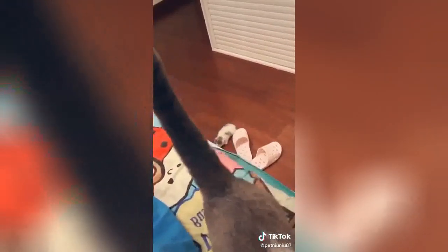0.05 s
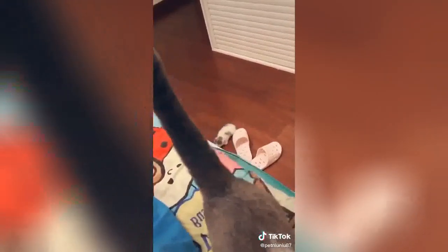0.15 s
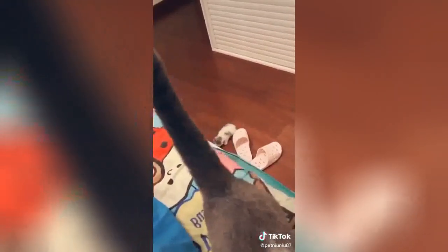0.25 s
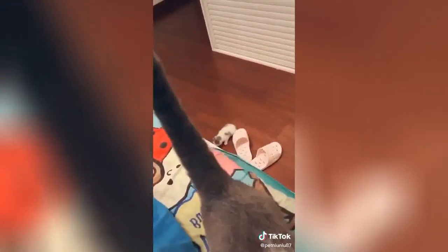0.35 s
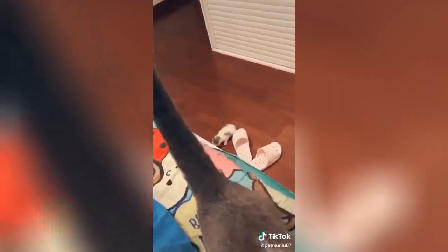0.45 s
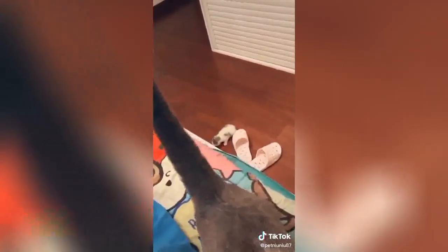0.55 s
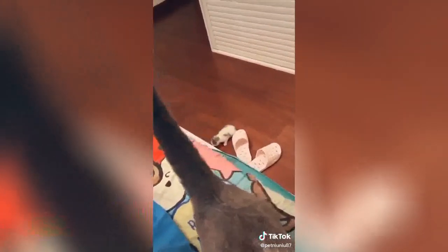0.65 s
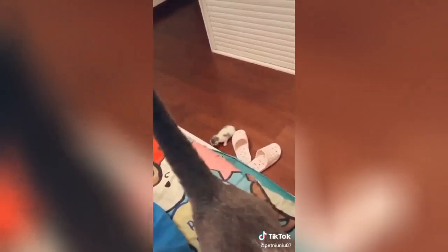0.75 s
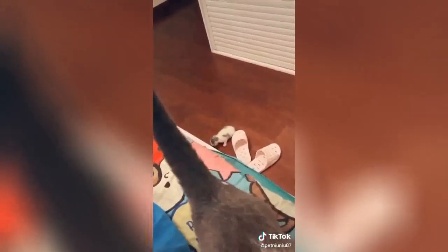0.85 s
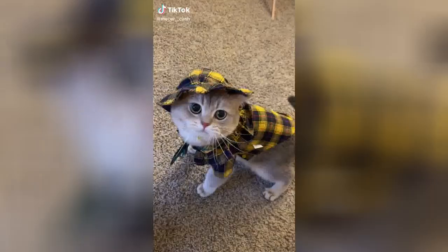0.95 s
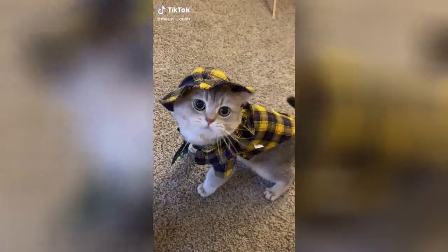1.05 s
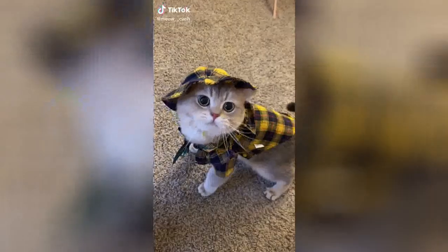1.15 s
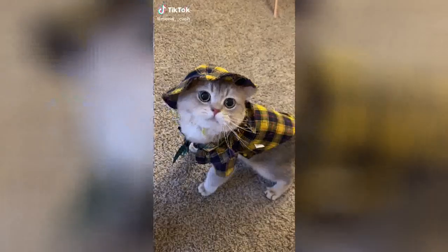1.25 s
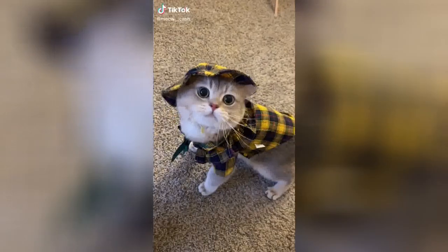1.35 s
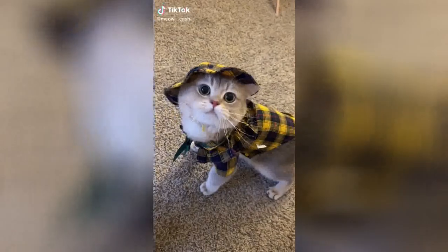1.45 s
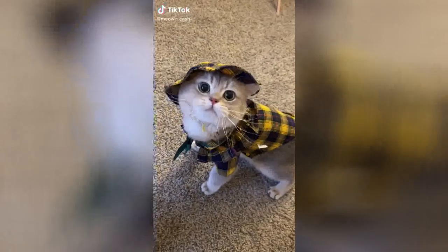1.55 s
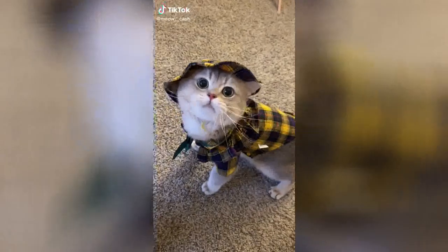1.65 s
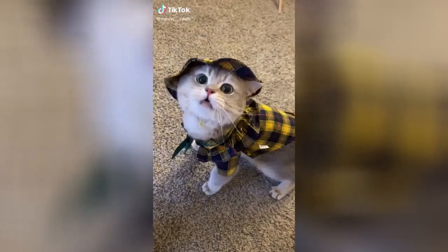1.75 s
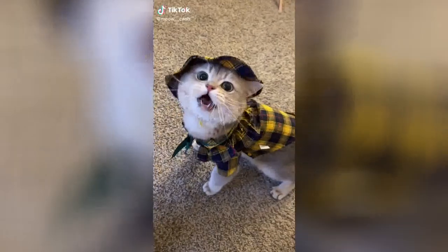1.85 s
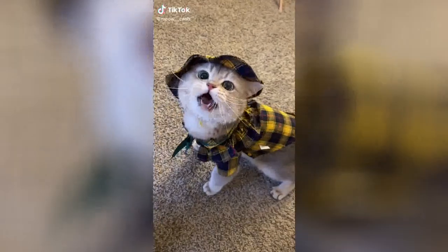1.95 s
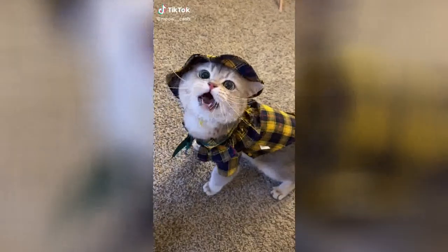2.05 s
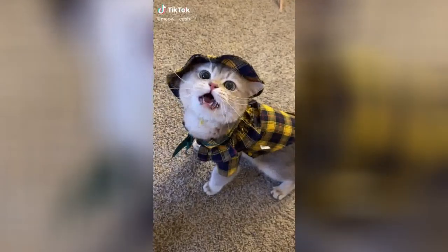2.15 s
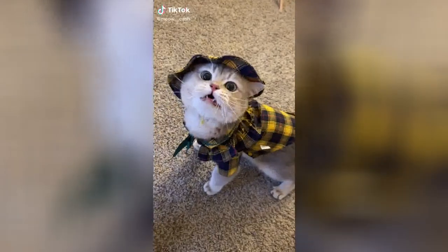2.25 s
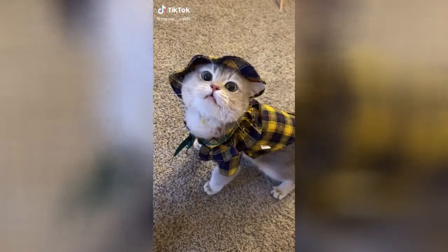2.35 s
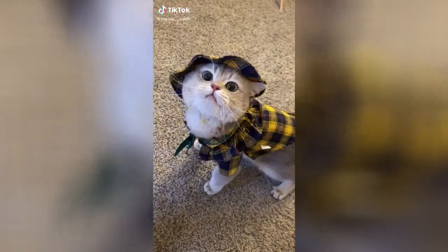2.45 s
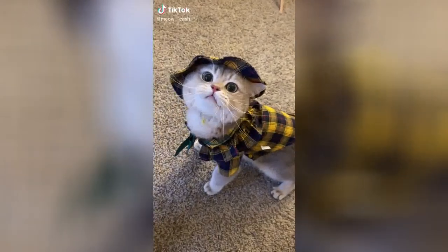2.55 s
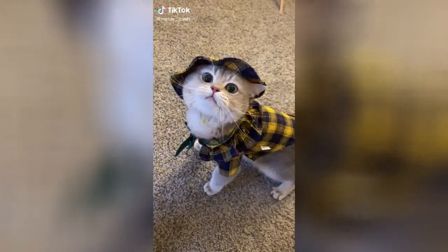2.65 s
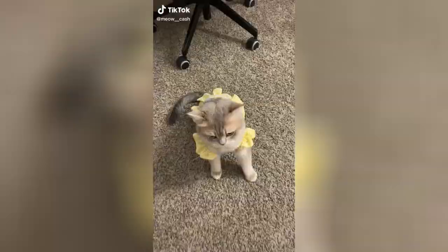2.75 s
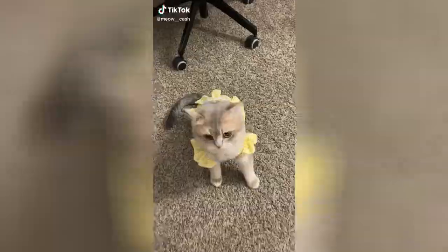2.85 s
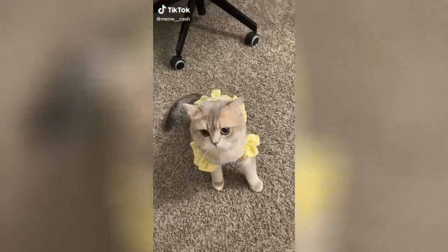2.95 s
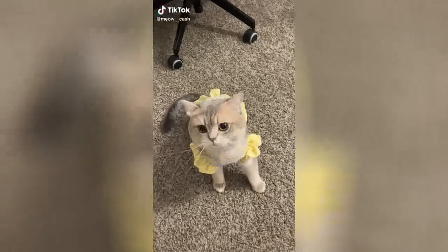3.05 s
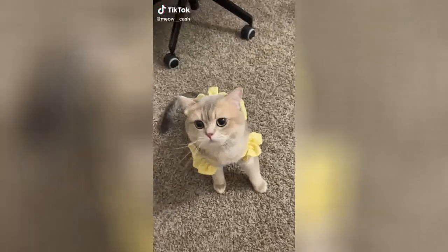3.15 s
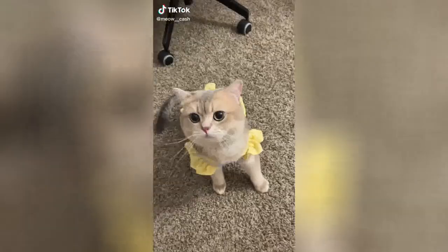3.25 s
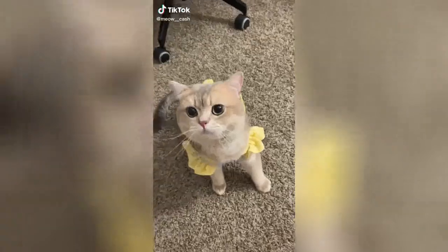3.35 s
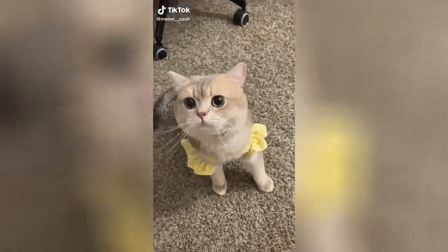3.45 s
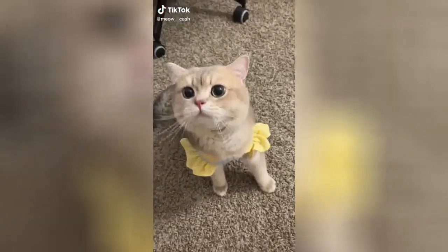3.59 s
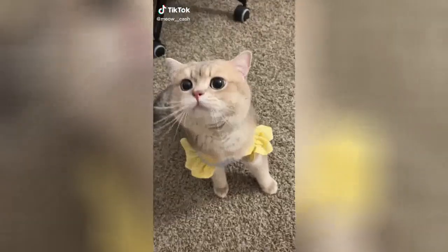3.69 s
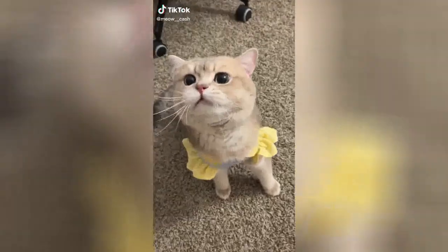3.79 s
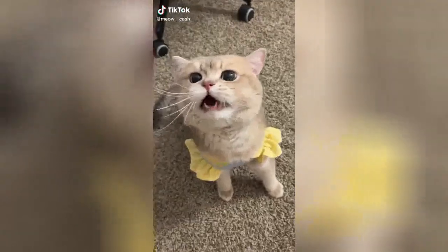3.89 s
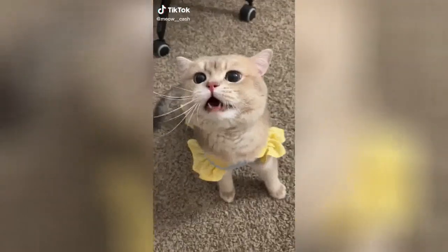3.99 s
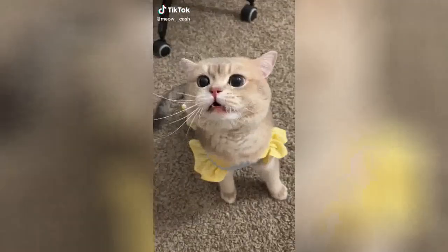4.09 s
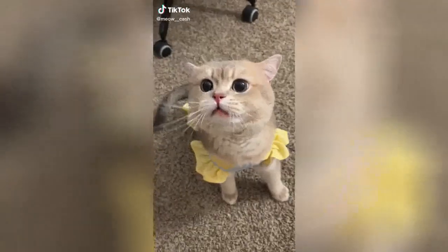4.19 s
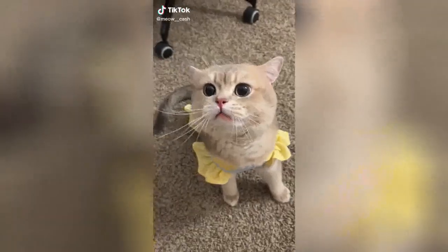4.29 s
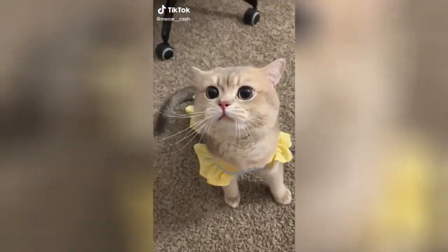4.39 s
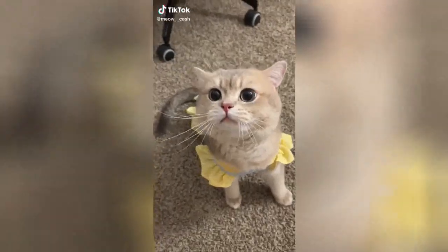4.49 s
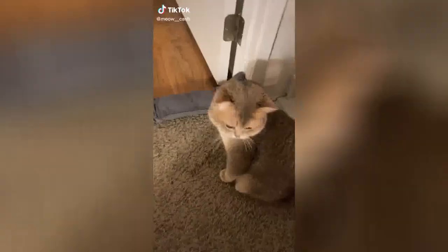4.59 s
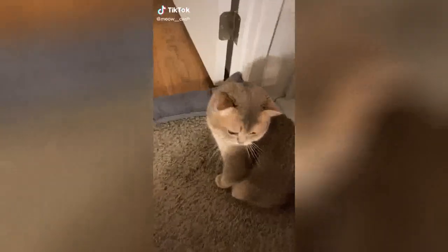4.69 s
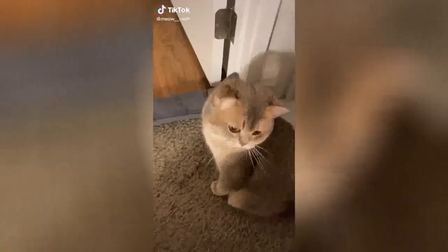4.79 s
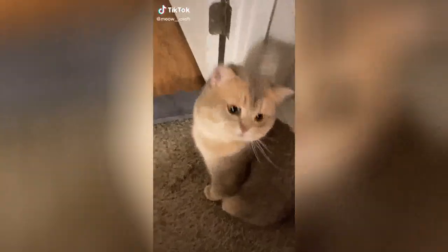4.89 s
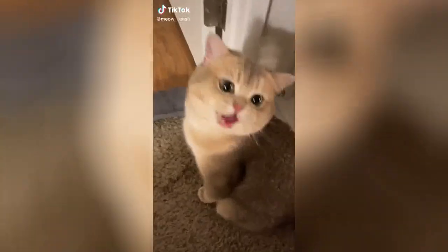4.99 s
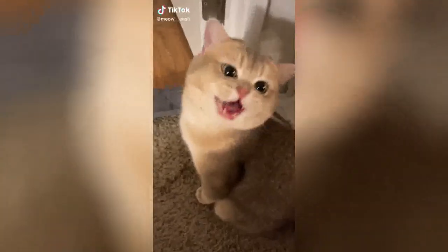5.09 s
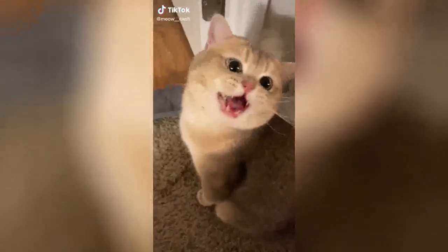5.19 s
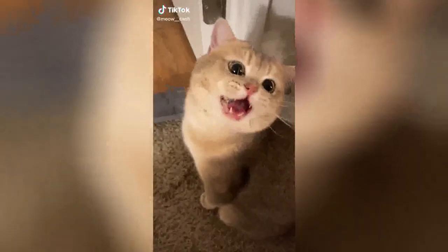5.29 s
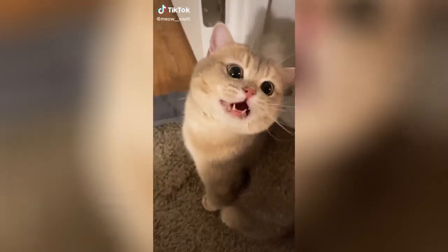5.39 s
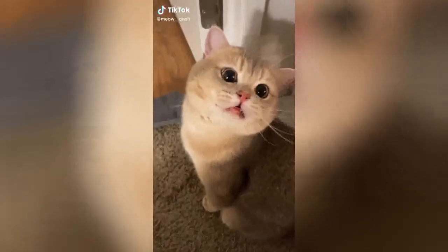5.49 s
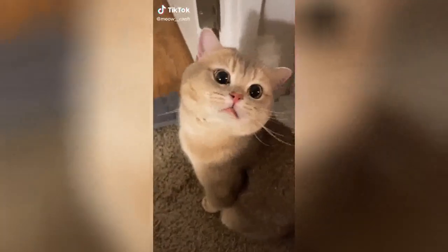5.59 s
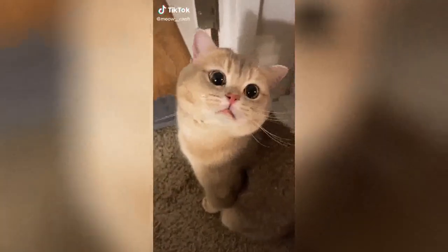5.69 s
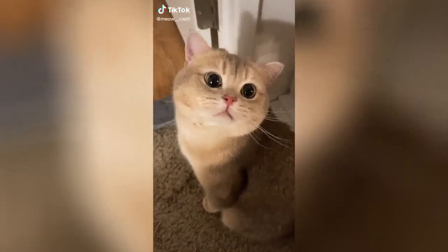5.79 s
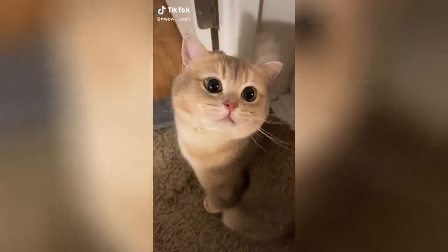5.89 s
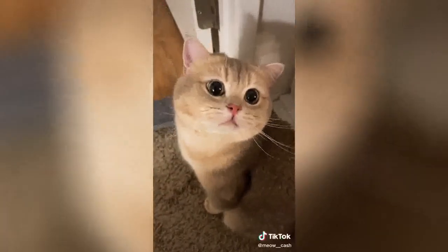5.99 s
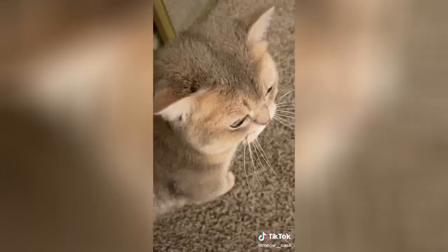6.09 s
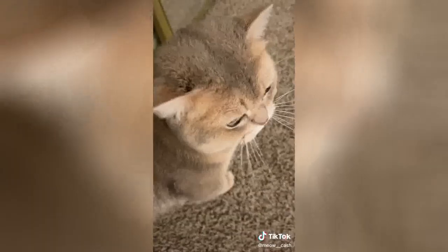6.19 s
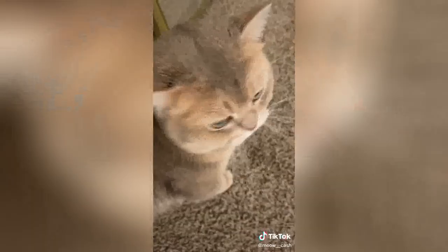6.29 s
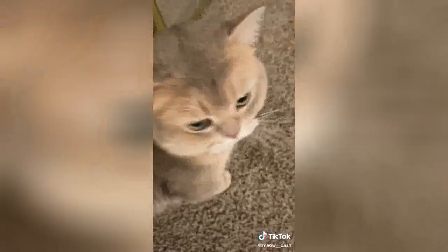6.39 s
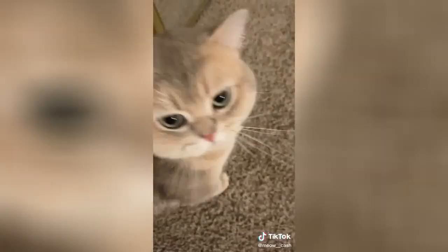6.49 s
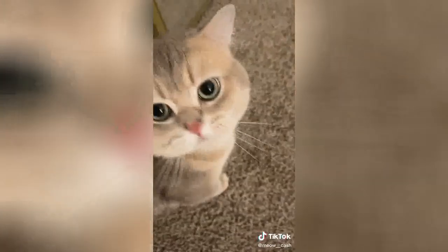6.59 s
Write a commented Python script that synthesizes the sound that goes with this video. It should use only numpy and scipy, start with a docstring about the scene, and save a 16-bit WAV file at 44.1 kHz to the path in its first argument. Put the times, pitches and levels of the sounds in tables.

```python
"""Cats meow close by in quiet rooms, each with its own hum, air and short echo; silent joins part the rooms.
First comes a faint, high, falling meow. The next two start with the mouth closed, trilling about 40 times
a second, then open and ring clean and bright; the later one also growls. A plain open meow follows, and
a last, trilled one is cut short. Each is a stack of harmonics shaped by throat and mouth (source and
filter). Along the way fur rustles, lips smack and small things tick."""
import sys
import numpy as np
from scipy import signal
from scipy.fft import rfft, irfft
from scipy.io import wavfile
from scipy.ndimage import uniform_filter1d

SR = 44100
rng = np.random.default_rng(int(sys.argv[2]) if len(sys.argv) > 2 else 0)


def wav_out(sig):
    """Save sig, one row per channel (or a flat mono array), as 16-bit PCM at SR to the path in sys.argv[1]."""
    wavfile.write(sys.argv[1], SR, np.round(np.clip(np.atleast_2d(sig).T, -1, 1) * 32767).astype(np.int16))


N = 292824
T = np.arange(N) / SR
TOP_HZ = 13300
OPPOSED = np.array([[1], [-1]])  # plus on the left, minus on the right

# The rooms in turn. Each row: start in seconds, end in seconds, hum frequency in Hz, hum width in Hz,
# hum over rumble in dB, side over mid of the air in dB.
ROOMS = [(0.193, 0.833, 68, 12, 4, -30.5), (1.116, 2.712, 56.7, 13.5, -0.5, -3),
         (2.724, 3.392, 55, 22, -8.5, -26.5), (3.407, 4.521, 52.4, 16, 2, -17.5),
         (4.541, 6.076, 56.9, 6.7, 5, -5), (6.083, 6.646, 59, 20, -14, -12)]
# Treble spectrum of the open mouth, one list a meow. Each point: frequency in Hz, relative level in dB.
OPEN_TREBLE = [
    [(3710, -32), (6300, -10), (7000, 0), (8050, -5), (9100, -1), (10200, -6), (11400, -14), (13400, -30)],
    [(1880, -15), (3200, 7.5), (4220, -4), (4780, -7), (6650, 2), (7630, -5.5), (8500, -15.5), (8860, -38),
     (9520, -24), (10600, -19), (11000, -28), (12900, -41), (13400, -73)],
    [(2120, -27), (3600, -12), (3870, -27), (4220, 2), (4590, -15), (6780, -6), (7120, -17), (8630, -18),
     (8870, -42), (11900, -35), (13400, -61)],
    [(2120, -30), (3700, 0), (4300, -6), (4850, -20), (5660, -5), (6300, -5), (7110, -8), (8330, -19),
     (8940, -35), (9760, -25), (12700, -30), (13400, -46)],
    [(1880, -18), (3200, 10), (3900, -15), (4320, 8), (4900, -16), (5290, -12), (5690, -20), (6810, -12),
     (7630, -35), (10400, 5.5), (13400, -28)],
]
# Treble spectrum of a closed mouth. Each point: frequency in Hz, relative level in dB.
CLOSED_TREBLE = [(1880, -41), (3200, -11), (4420, 11.5), (4720, -11), (4840, -34), (4990, -22), (5450, -31),
                 (6730, 3), (8650, -27.5), (9810, 0), (10600, -24), (11600, -24), (13400, -65)]
# Lower edge of each meow's treble in Hz.
TREBLE_EDGE_HZ = [6300, 3200, 3600, 3600, 3200]


def undb(db):
    """Amplitude ratio of a level in decibels."""
    return 10 ** (np.asarray(db) / 20)


def unit(x):
    """Normalisation to an rms of 1."""
    return x / np.sqrt(np.mean(x ** 2) + 1e-30)


def on_log(spectrum, hz):
    """Level in dB, interpolated on a logarithmic frequency axis."""
    f, db = np.transpose(spectrum)
    return np.interp(np.log(np.maximum(hz, 1)), np.log(f), db)


def coloured(size, gain_at):
    """Spectral shaping: white noise weighted by gain_at(Hz), at an rms of 1."""
    m = 2 ** int(np.ceil(np.log2(size)))
    spectrum = rfft(rng.standard_normal(m)) * gain_at(np.arange(m // 2 + 1) * SR / m)
    return unit(irfft(spectrum, m)[:size])


def wander(size, rate_hz):
    """Low-pass noise: a smooth random fluctuation with an rms of 1."""
    return coloured(size, lambda f: (f > 0) / (1 + (f / rate_hz) ** 4))


def fade(t, start, end, edge_s):
    """Trapezoidal envelope."""
    return np.clip(np.minimum(t - start, end - t) / edge_s, 0, 1)


def blend(pair, share):
    """Linear interpolation from the first value of a pair to the second."""
    return pair[0] + share * (pair[1] - pair[0])


def room_tone(room, t):
    """Shaped noise: rumble and a resonant hum in the middle, air above 250 Hz with some stereo width."""
    # Noise spectrum, one list a room. Each point: frequency in Hz, relative level in dB.
    spectra = [
        [(15, -39.5), (25, -5.5), (88, -6), (115, -9.5), (135, -18), (304, -23), (688, -39), (850, -36.5),
         (1560, -35), (11200, -50.5), (13500, -69)],
        [(15, -40.5), (25, -22.5), (48, -9), (118, -4.5), (166, -19), (347, -23), (515, -31.5), (785, -42.5),
         (944, -49.5), (1020, -42.5), (1160, -79.5), (1870, -35), (2500, -53.5), (10900, -66), (13500, -70.5)],
        [(15, -30), (25, 3), (86, -11.5), (124, -9.5), (289, -17.5), (452, -30.5), (620, -37), (2500, -42),
         (6440, -61.5), (10900, -45.5), (13500, -57.5)],
        [(15, -35.5), (25, -12.5), (58, -1.5), (86, -26), (121, -12), (321, -30.5), (347, -34), (558, -42),
         (725, -71), (2020, -47.5), (3080, -57.5), (10900, -72.5), (13500, -66.5)],
        [(15, -61), (25, -30), (54, -8.5), (154, -16.5), (205, -28), (338, -16), (429, -28), (653, -36.5),
         (745, -39), (1200, -40.5), (5080, -64.5), (6610, -42), (8840, -87), (11800, -55), (13500, -92)],
        [(15, -61), (25, -31), (124, 11.5), (440, -14.5), (636, -29), (1110, -18.5), (2130, -43.5),
         (2930, -33.5), (9070, -54.5), (11200, -30), (13500, -51)],
    ]
    # Level of each room's air in dB.
    air_db = [-61.5, -53.5, -66, -57.5, -49, -59.5]
    # Bass level of each room. Each row: level at the start in dB, level at the end in dB.
    bass_levels = [(-47, -46), (-37, -41), (-48, -52), (-41, -45), (-38, -41), (-53, -50)]
    # Swells of the bass. Each row: centre in seconds, half length in seconds, rise in dB.
    swells = [(4.7, .07, 6), (5.65, .15, 4), (6.31, .06, 13)]
    start, end, hum_hz, width_hz, hum_db, side_db = ROOMS[room]
    n = len(t)
    rumble = coloured(n, lambda f: undb(on_log(spectra[room], f)) * (f < 250))
    hum = coloured(n, lambda f: 1 / (1 + (2 * (f - hum_hz) / width_hz) ** 2))
    mid, side = (coloured(n, lambda f: undb(on_log(spectra[room], f)) * (f >= 250)) for _ in range(2))
    air = undb(air_db[room] + wander(n, 4)) * (mid + undb(side_db) * side * OPPOSED)
    bass_db = np.interp(t, (start, end), bass_levels[room]) + 2.2 * wander(n, 5)
    bass_db += sum(db * np.exp(-((t - centre) / half_s) ** 2) for centre, half_s, db in swells)
    return undb(bass_db) * unit(rumble + undb(hum_db) * hum) + air


def rustle():
    """Friction noise of fur and cloth: each grainy stroke rises quickly, holds and dies away."""
    # Each row: start in seconds, time until the decay in seconds, level below 5 kHz in dB, above it in dB.
    strokes = [(2.73, .05, -62, -71), (2.81, .05, -57, -70), (3.05, .15, -69, -78), (3.31, .07, -69, -74),
               (4.43, .07, -67, -77), (4.51, .012, -56, -69), (4.55, .12, -58, -61), (4.66, .1, -53, -55),
               (4.83, .035, -46, -70), (6.09, .06, -65, -70), (6.22, .08, -58, -80), (6.3, .03, -56, -76)]
    attack_s, t60_s = .03, .2
    grain = undb(2 * wander(N, 58))
    low = coloured(N, lambda f: (f > 300) * (f < 5000) / (1 + (f / 1500) ** 2) ** .81)
    high = coloured(N, lambda f: (f >= 5000) * (f < 12200) * (1 - .98 * (abs(f - 9000) < 350)))
    out = np.zeros(N)
    for start, held_s, low_db, high_db in strokes:
        attack = np.clip((T - start) / attack_s, 0, 1)
        decay = 1000. ** (-np.maximum(T - start - held_s, 0) / t60_s)
        out += attack * decay * (undb(low_db) * low + undb(high_db) * high)
    return out * grain


def ticks():
    """Ticks and lip smacks: an impulse and a short noise burst excite a broad resonance."""
    # Each row: start in seconds, peak level in dB, centre frequency in Hz, nominal bandwidth in Hz.
    snaps = [(1.6462, -33, 6500, 6000), (2.8066, -30, 2220, 4000), (3.7884, -23, 11500, 7000),
             (3.8074, -14, 4450, 5000), (3.8155, -17, 5000, 12000), (4.2018, -35, 2200, 2800),
             (4.5186, -41, 1960, 4000), (4.8718, -27, 1950, 4000), (6.2622, -38, 1100, 1400),
             (6.3135, -33, 1200, 1800), (6.5894, -33, 9500, 5000)]
    t60_s = .025
    out, t = np.zeros(N + SR), np.arange(4096) / SR
    for start, db, hz, width_hz in snaps:
        burst = rng.standard_normal(len(t)) * 1000. ** (-t / t60_s)
        burst[0] = 2.5
        b, a = signal.iirpeak(hz, hz / width_hz, SR)
        ring = signal.lfilter(b, a, signal.lfilter(b, a, burst))
        i = int(start * SR)
        out[i:i + len(t)] += undb(db) * ring / np.abs(ring).max()
    return out[:N]


def reverberate(sound, t60_s, echo_db):
    """Convolution with a room's impulse response: the direct sound, then exponentially decaying noise."""
    t = np.arange(SR // 2) / SR
    response = rng.standard_normal(len(t)) * 1000. ** (-t / t60_s) * np.clip(t / .0042, 0, 1)
    response *= undb(echo_db) / np.sqrt(np.sum(response ** 2))
    response[0] = 1
    return signal.fftconvolve(sound, response[None], axes=1)


def panning(call, freqs, shut):
    """Level difference between channels: each harmonic's left gain, the reciprocal of its right gain."""
    # Each row: a meow's shut and open curves (None is the middle) of frequency in Hz,
    # left over right in dB.
    places = [(None, None), ([(60, 0.0), (110, 0.0), (200, 0.0), (360, -2.5), (660, 7.0), (1190, 14.0),
              (2170, 0.5), (3940, -1.5), (7160, 0.5), (13000, 0.5)], [(350, -1.6), (650, 9.8), (1200, 4.2),
              (2100, -.6), (4000, -4.2), (7000, .4), (12500, -2.4)]), (None, None), (None, [(350, -.2),
              (650, -6.4), (1200, -3.4), (2100, -.6), (4000, -.2), (12500, -.6)]), (None, None)]
    shut_db, open_db = (on_log(curve, freqs) if curve else 0 * freqs for curve in places[call])
    return undb(blend((open_db, shut_db), shut) / 2)


def breath(call, closed, mouth_gain, treble_gain, nose_gain):
    """Turbulence noise in the mouth band, in the treble and, while the mouth is closed, in the nose."""
    n = len(closed)
    nose = coloured(n, lambda f: (f > 250) / (1 + ((f - 900) / 350) ** 2))
    mouth = coloured(n, lambda f: (f / 2700) ** 4 / (1 + (f / 2700) ** 8))
    trebles = [coloured(n, lambda f: undb(on_log(curve, f)) * (f > TREBLE_EDGE_HZ[call]))
               for curve in (CLOSED_TREBLE, OPEN_TREBLE[call])]
    return mouth_gain * mouth + treble_gain * blend(trebles, 1 - closed) + closed * nose_gain * nose


def throat_db(call, freqs, brightness):
    """Transfer function of the throat for the low harmonics, blended between two curves by brightness."""
    # Each row: a meow's shut and open curves of frequency in Hz, level over effort in dB.
    throats = [ ([(600, -6), (1100, 0), (2200, -10), (3400, -16), (4100, -18), (4600, -4)], [(600, -8),
               (1100, 0), (1500, 15), (2300, 16), (3400, -4), (4600, 0)]), ([(340, 0), (670, -4), (735, 2),
               (1000, 0), (1090, -8), (1400, -17)], [(400, -10), (750, 2), (790, -5), (830, -8),
               (1230, -17), (1640, -21)]), ([(360, 0), (720, -1), (1080, -8), (1450, -14), (2400, -21)],
               [(470, -7), (610, -13), (950, 0), (1220, -9), (1400, -18), (1800, 3), (2000, 0),
               (2450, -22)]), ([(390, 0), (460, -3), (780, -3), (900, 1), (1200, -14), (1350, -21),
               (1700, -21)], [(400, -10), (470, -8), (800, 1), (930, -1), (1200, -7), (1400, -3),
               (1650, -11), (1780, -18), (1900, -5)]), ([(360, 0), (720, -11), (1080, -12), (1440, -19)],
               [(375, -1), (750, -3), (1100, -11), (1500, -18)]), ]
    return blend([on_log(curve, freqs) for curve in throats[call]], brightness)


def formant_gains(call, freqs, shut, mouth_hz, width_hz, mouth_db, treble_db):
    """Formant filtering: the mouth resonance weights harmonics below the treble edge, a spectrum above."""
    above_edge = np.clip((freqs - TREBLE_EDGE_HZ[call]) / freqs[0] + .5, 0, 1)
    mouth = (1 - above_edge) / (1 + (2 * (freqs - mouth_hz) / width_hz) ** 2)
    colour_db = blend((on_log(CLOSED_TREBLE, freqs), on_log(OPEN_TREBLE[call], freqs)), 1 - shut)
    treble = above_edge * undb(colour_db) * (freqs < TOP_HZ)
    treble /= np.sqrt(np.sum(treble ** 2, axis=0) + 1e-12)
    return undb(mouth_db) * mouth + undb(treble_db) * treble


def growl(voice, phase):
    """Period doubling: alternate cycles differ, and the half harmonics ring in the nose at 900 Hz."""
    return signal.lfilter(*signal.iirpeak(900, Q=2.2, fs=SR), voice * np.cos(phase / 2))


def meow(call, start, end, contour):
    """Source and filter: throat and mouth shape harmonics that the trill modulates; breath joins them."""
    # Each row, one a meow: trill depth from 0 to 1, start and end of its fade in seconds, trill rate in Hz,
    # echo T60 in seconds, echo level in dB, mouth bandwidth in Hz, phase spread between channels
    # in radians, growl time in seconds, growl depth as a factor.
    manners = [(0, 0, .1, 40, .5, -1.5, 1500, 0, 0, 0), (.42, 1.7, 1.78, 39.93, .3, -18, 800, .6, 0, 0),
               (.5, 3.715, 3.818, 41.2, .3, -19, 800, 0, 3.6, 2.6), (0, 0, .1, 40, .3, -18, 620, .6, 0, 0),
               (.48, 6.58, 6.8, 35.9, .15, -16, 1500, 0, 0, 0)]
    # Each row, one a meow: (shut, open) pairs of mouth resonance in Hz, its level over effort in dB
    # and treble over effort in dB; then the base level of breath over harmonics in dB.
    vowels = [((5700, 5710), (-24, -22), (-12, -2), -16), ((1760, 2060), (-20, 1), (-24, -8), -31),
              ((2350, 2600), (-23, -5), (-24, -18), -20), ((2500, 2480), (-24, 4), (-25, -3), -29),
              ((2400, 2410), (-28, -19), (-34, -25), -18)]
    (depth, fade_start, fade_end, trill_hz, t60_s, echo_db,
     width_hz, spread, growl_s, growl_depth) = manners[call]
    mouth_hz_pair, mouth_db_pair, treble_db_pair, breath_db = vowels[call]
    t = T[int(start * SR):int(end * SR)]
    n, slow = len(t), t[::64]  # the articulation moves on a coarse time grid
    up = lambda curve: np.interp(t, slow, curve)
    times, *columns = np.transpose(contour)
    pitch_hz, effort_db, brightness = (np.interp(slow, times, column) for column in columns)
    pitch_hz = uniform_filter1d(pitch_hz, size=11, mode="nearest")
    shut = np.clip((fade_end - slow) / (fade_end - fade_start), 0, 1)  # 1 in the closed-mouth trill

    # A call starts near a pure tone: its overtones are held back for the first 45 ms.
    held_db = 6 * np.clip(1.5 - 1.5 * (slow - start) / .045, 0, 1)
    mouth_hz, resonance_db = blend(mouth_hz_pair, brightness), blend(mouth_db_pair, brightness)
    mouth_db = effort_db + resonance_db - 3 * held_db
    treble_db = effort_db + blend(treble_db_pair, brightness ** 2.5) - 3 * held_db  # the treble comes late

    # The voice rasps after the mouth flies open and breaks into air as it ends.
    rise_db = signal.lfilter([1], [1, -.985], np.maximum(np.gradient(resonance_db), 0))
    rasp_db = (1 - shut) * np.minimum(1.1 * rise_db, 17)
    ending_db = 30 * np.clip(1 - (end - slow) / .07, 0, 1) * (end < T[-1])
    leak = undb(breath_db + rasp_db + ending_db + 13.5 * shut)
    voiced = 1 / np.sqrt(1 + leak ** 2)  # leaking air leaves less for the upper harmonics

    order = np.arange(1, int(TOP_HZ / pitch_hz.min()) + 1)[:, None]
    freqs = order * pitch_hz
    waver, drift = rng.standard_normal((2, 64, 1024))[:, :len(order), :len(slow)]
    gain = voiced * formant_gains(call, freqs, shut, mouth_hz, width_hz, mouth_db, treble_db)
    low_db = effort_db + throat_db(call, freqs[:4], brightness) - held_db * (order[:4] - 1)
    gain[:4] = undb(low_db)  # the throat sets the four lowest harmonics
    gain *= undb(9 * uniform_filter1d(uniform_filter1d(waver, size=24), size=12))
    pan = panning(call, freqs, shut)
    # Each harmonic reaches the two channels at a phase of its own.
    lag = spread * ((-1) ** order + 5 * uniform_filter1d(drift, size=24)) / 2
    lag *= np.clip(abs(freqs - mouth_hz) / 1500, .15, 1)

    # The trill swings the pitch once a beat, and each harmonic swells at its own moment of the beat.
    closed = up(shut)
    beat = 2 * np.pi * np.cumsum(trill_hz * (1 + .04 * wander(n, 8))) / SR
    swing = closed * (.027 * np.cos(beat) + .02 * wander(n, 120)) + .0028 * wander(n, 40)
    phase = 2 * np.pi * np.cumsum(up(pitch_hz) * (1 + swing)) / SR
    trill = depth * closed * undb(2 * wander(n, 15))
    voice = np.zeros((2, n))
    for j in range(len(order)):
        throb = 1 + trill * np.cos(beat + 1.6 * (j + 1)) / (1 + .3 * max(j - 2, 0))
        harmonic = np.sqrt(2) * np.cos((j + 1) * phase + .12 * j ** 2 + up(lag[j]) * OPPOSED)
        voice += harmonic * throb * [up(gain[j] * pan[j]), up(gain[j] / pan[j])]
    voice += growl_depth * np.exp(-((t - growl_s) / .06) ** 2) * growl(voice, phase)

    airy = up(leak * voiced)
    air = breath(call, closed, mouth_gain=airy * up(undb(mouth_db)),
                 treble_gain=airy * up(undb(treble_db + 3.5)), nose_gain=up(undb(low_db[2] - 8)))
    puffs = (1 + .85 * np.cos(phase)) * (1 + .5 * trill * np.cos(beat))  # one puff of air a cycle
    return reverberate((voice + puffs * air) * fade(t, start, end, edge_s=.006), t60_s, echo_db)


def scene():
    """Superposition of all the sources, gated to silence between the rooms."""
    # One list a meow. Each row: time in seconds, pitch in Hz, effort in dB, brightness from 0 to 1:
    # mostly mouth opening, also the first meow's brief flutter at 0.4 s.
    contours = [
        [(.192, 1075, -62, 0), (.214, 1085, -46, 0), (.25, 1035, -51, .2), (.285, 1065, -43, .7),
         (.33, 1142, -39, 1.0), (.375, 1160, -35, 1.0), (.402, 1152, -35, .1), (.42, 1145, -38, 1.0),
         (.46, 1098, -41, .75), (.5, 1060, -44, .8), (.54, 931, -49, .8), (.585, 745, -52, .85),
         (.62, 690, -57, .6), (.67, 570, -63, .5)],
        [(1.12, 433, -52, 0), (1.148, 400, -35, 0), (1.16, 346, -37, 0), (1.22, 333, -35, .05),
         (1.56, 344, -28, 0), (1.66, 361, -21, 0), (1.725, 370, -21, .15), (1.756, 375, -18, .85),
         (1.81, 381, -20, .9), (1.865, 398, -14, 1.0), (1.93, 408, -17, 1.0), (2.03, 417, -18, 1.0),
         (2.1, 415, -19, 1.0), (2.16, 405, -20, .9), (2.198, 389, -22, .75), (2.212, 480, -27, .4),
         (2.225, 400, -37, .7), (2.25, 395, -46, .7)],
        [(3.449, 503, -50, 0), (3.469, 481, -25, 0), (3.487, 470, -39, 0), (3.51, 360, -35, 0),
         (3.6, 355, -26, .05), (3.72, 362, -24, 0), (3.8, 391, -25, .1), (3.845, 448, -23, .9),
         (3.9, 507, -22, 1.0), (3.915, 570, -26, .9), (3.945, 611, -24, .7), (4.04, 616, -24, .7),
         (4.075, 611, -31, .7), (4.105, 605, -23, .65), (4.16, 583, -29, .6), (4.197, 567, -35, .1),
         (4.215, 575, -50, .8), (4.25, 580, -58, .9)],
        [(4.831, 590, -48, 0), (4.85, 575, -35, 0), (4.872, 475, -24, 0), (4.892, 386, -28, 0),
         (4.915, 381, -23, .75), (4.96, 400, -19, .86), (5.0, 420, -20, .92), (5.07, 444, -25, .95),
         (5.14, 464, -23, 1.0), (5.215, 476, -22, 1.0), (5.29, 462, -22, 1.0), (5.34, 451, -26, .85),
         (5.39, 445, -25, .78), (5.44, 462, -25, .5), (5.46, 570, -33, .6), (5.5, 600, -55, .9)],
        [(6.436, 550, -44, 0), (6.448, 500, -26, .1), (6.46, 400, -31, 0), (6.472, 370, -18, 0),
         (6.55, 348, -23, .3), (6.66, 378, -23, 1.0)],
    ]
    out, gate = np.zeros((2, N + SR)), np.zeros(N)
    for call, contour in enumerate(contours):
        start, end = contour[0][0], contour[-1][0]
        sound = meow(call, start, end, contour)
        i = int(start * SR)
        out[:, i:i + sound.shape[1]] += sound
    for room, (start, end, *_) in enumerate(ROOMS):
        i = int(start * SR)
        t = T[i:int(end * SR)]
        out[:, i:i + len(t)] += room_tone(room, t)
        gate += fade(T, start, end, edge_s=.0049)
    return (out[:, :N] + rustle() + ticks()) * gate


def record(dry):
    """Band limiting: a steep elliptic low-pass filter cuts the top."""
    return signal.sosfilt(signal.ellip(10, .2, 80, TOP_HZ, fs=SR, output="sos"), dry)


dry = scene()
out = record(dry)
wav_out(out)
```